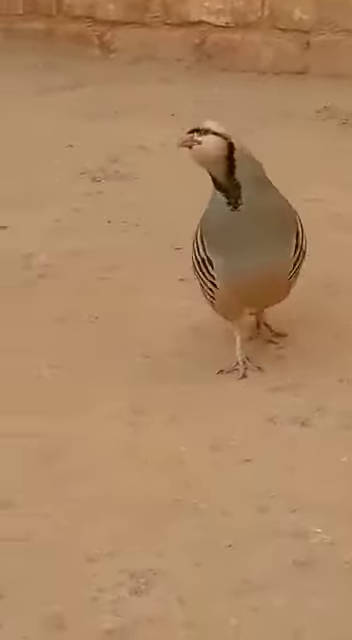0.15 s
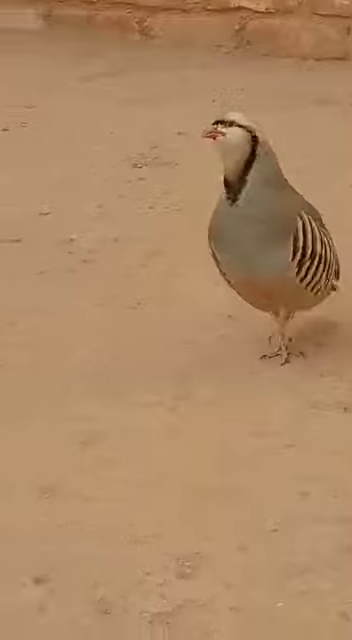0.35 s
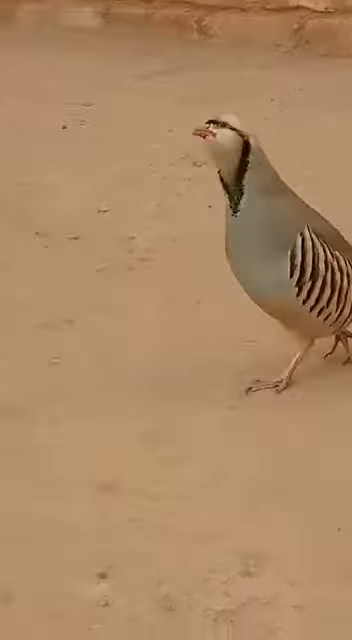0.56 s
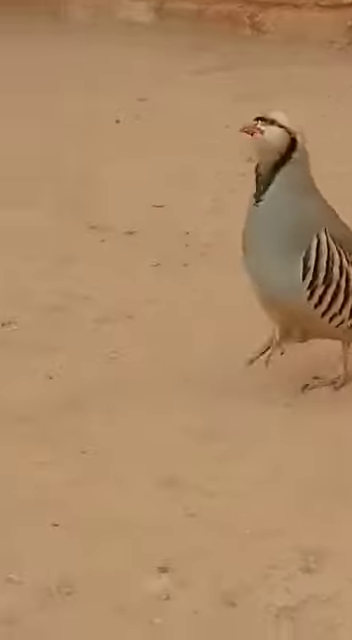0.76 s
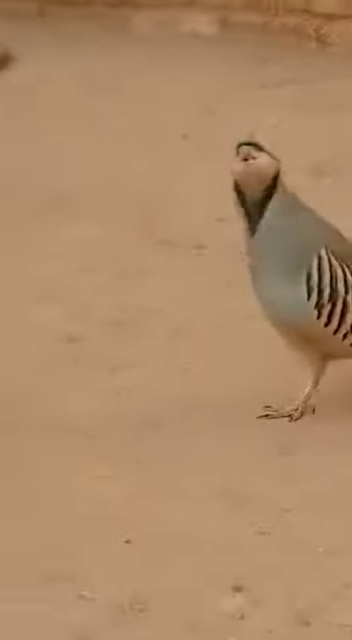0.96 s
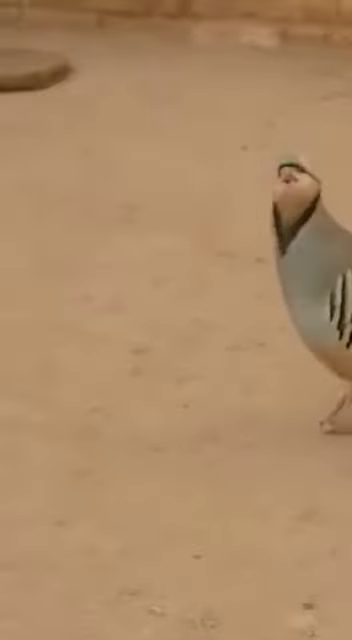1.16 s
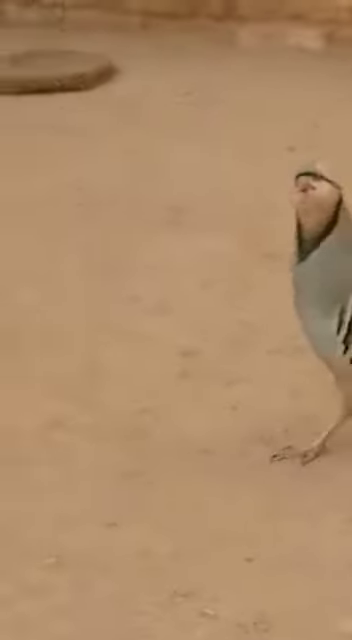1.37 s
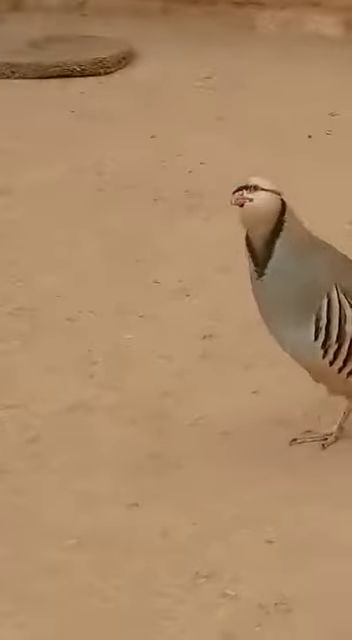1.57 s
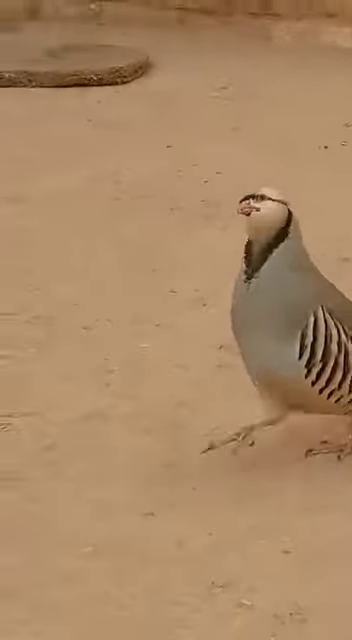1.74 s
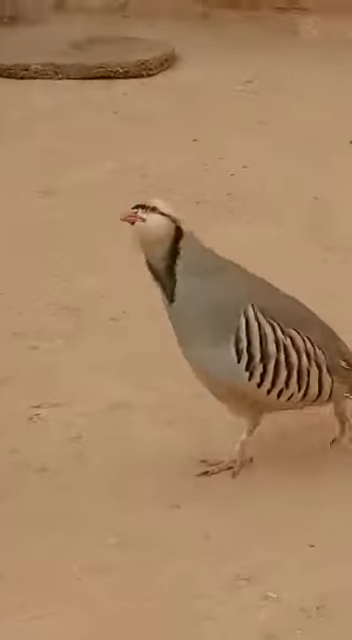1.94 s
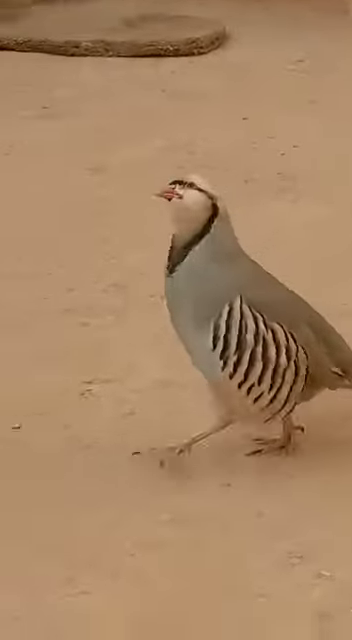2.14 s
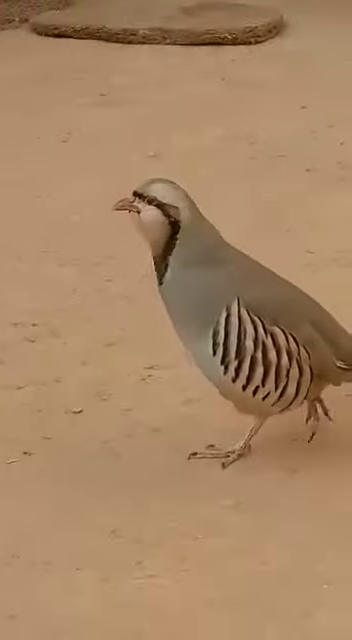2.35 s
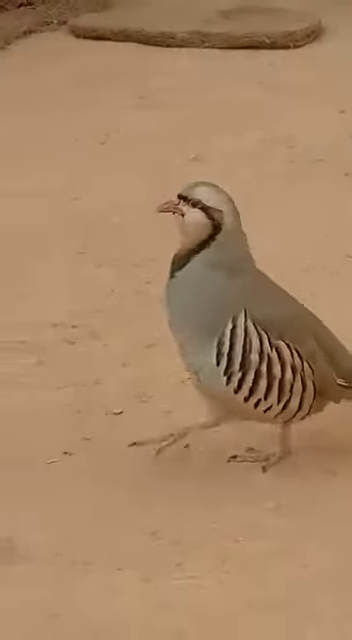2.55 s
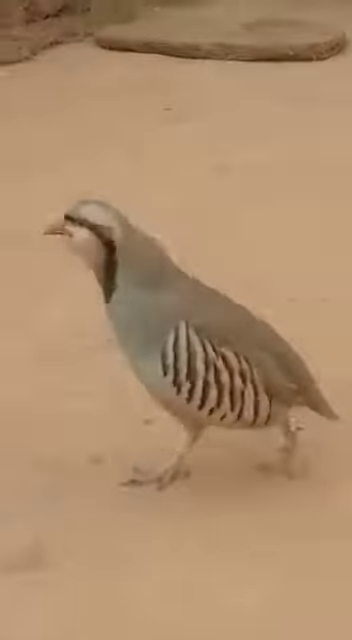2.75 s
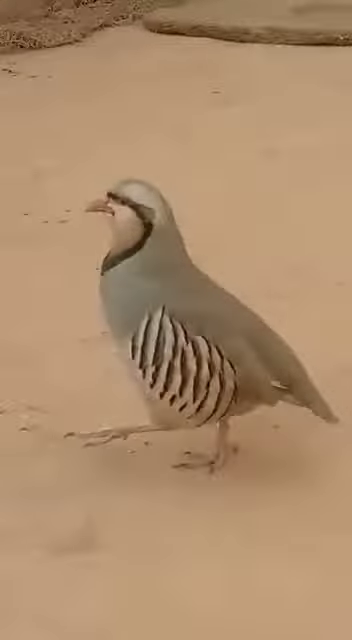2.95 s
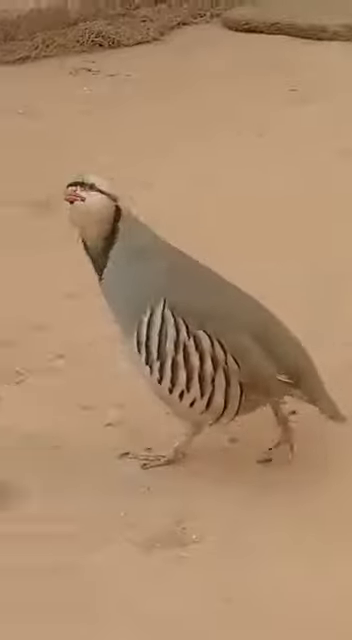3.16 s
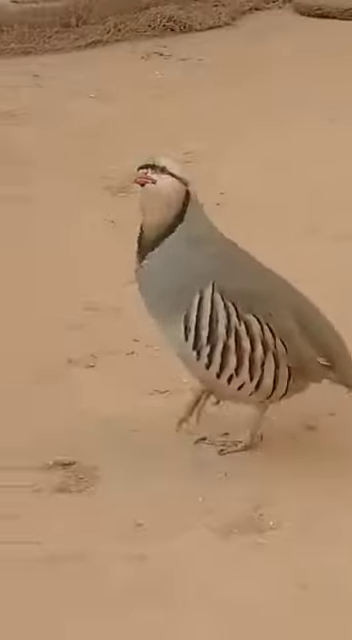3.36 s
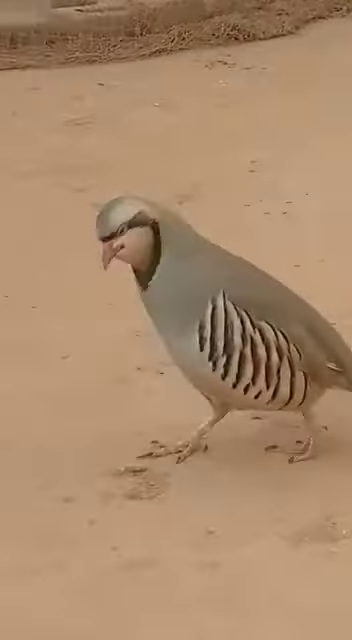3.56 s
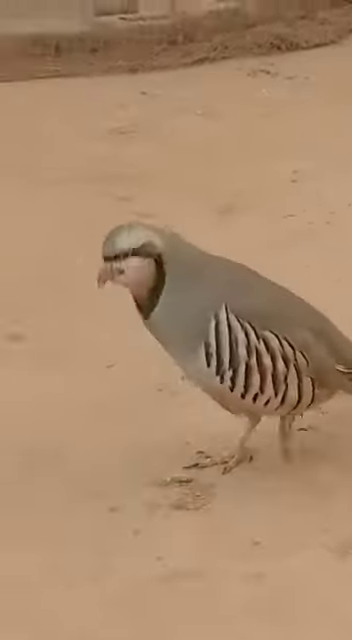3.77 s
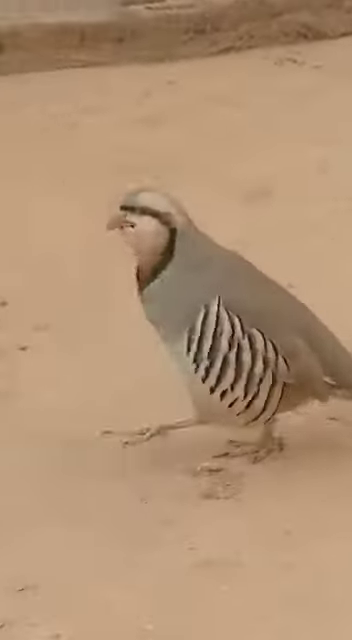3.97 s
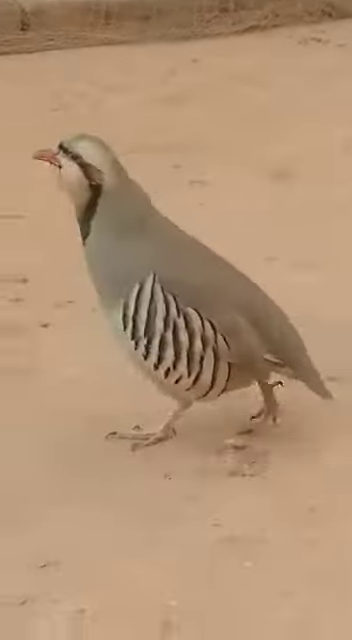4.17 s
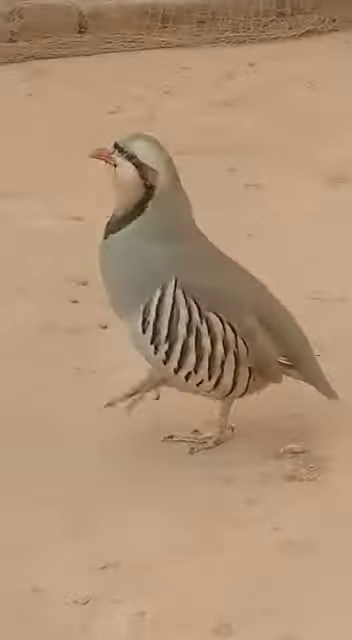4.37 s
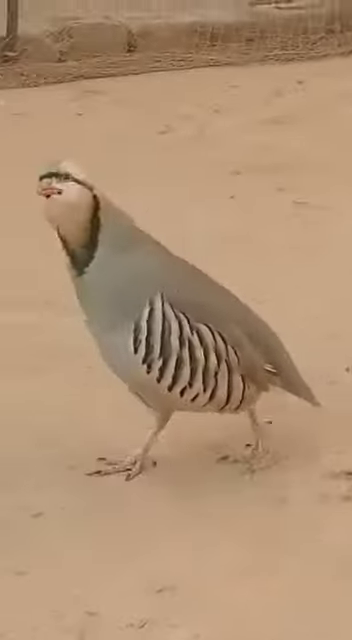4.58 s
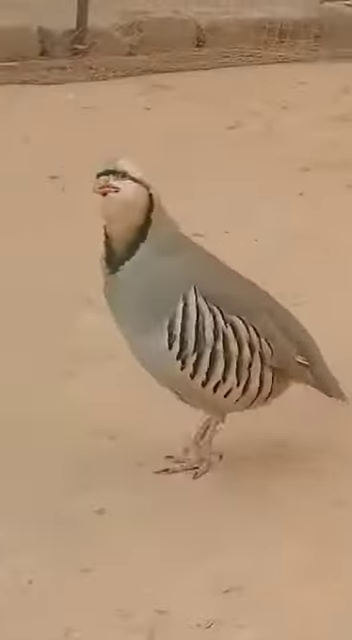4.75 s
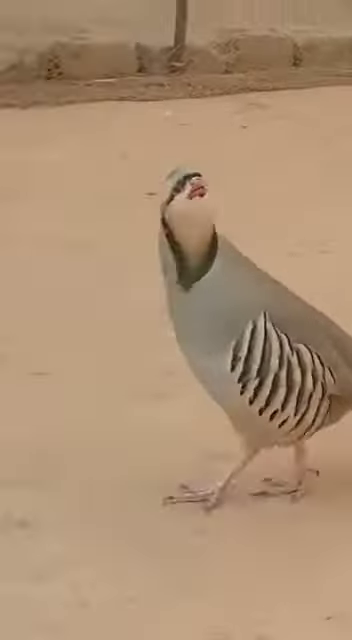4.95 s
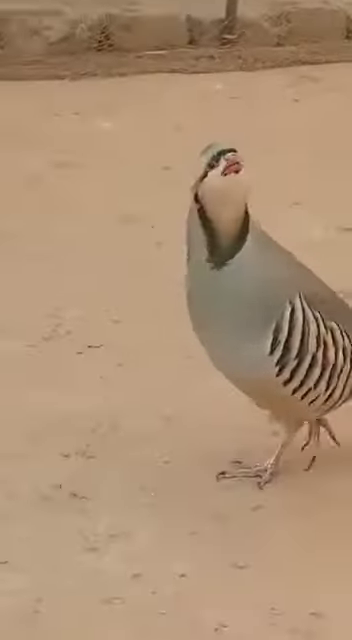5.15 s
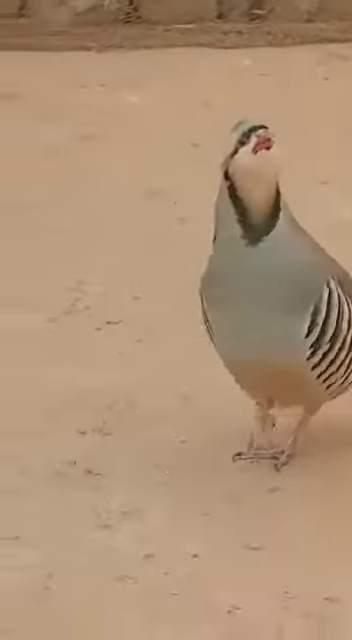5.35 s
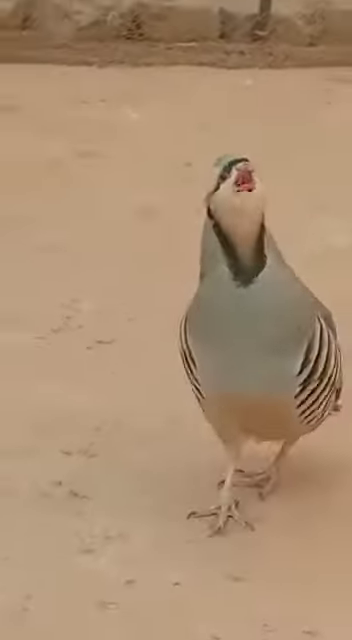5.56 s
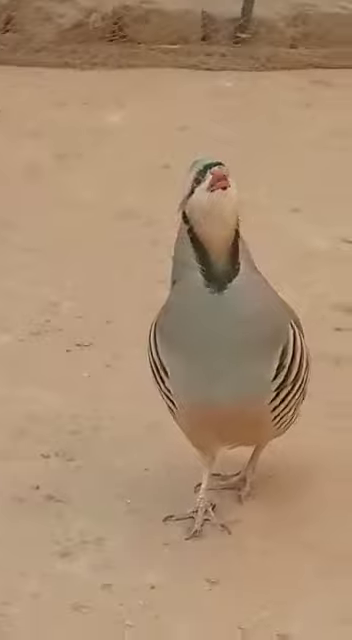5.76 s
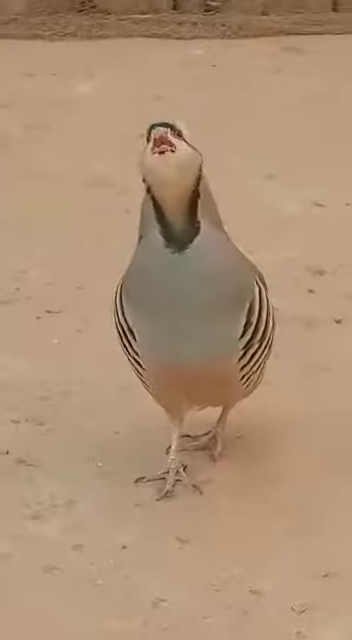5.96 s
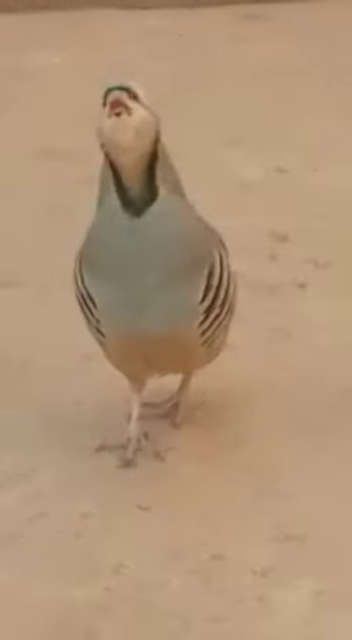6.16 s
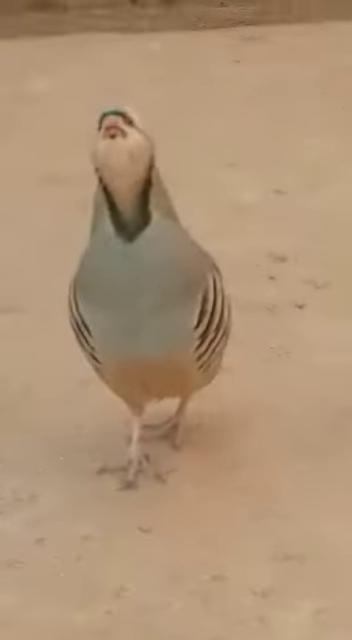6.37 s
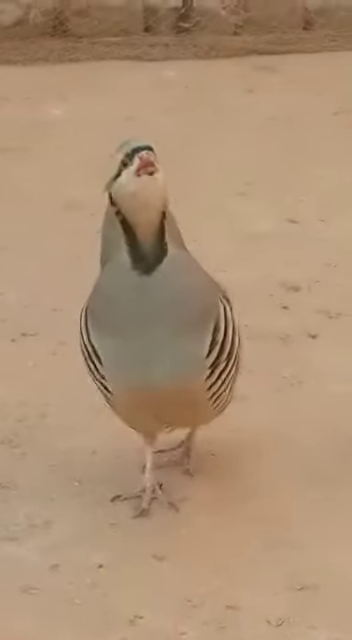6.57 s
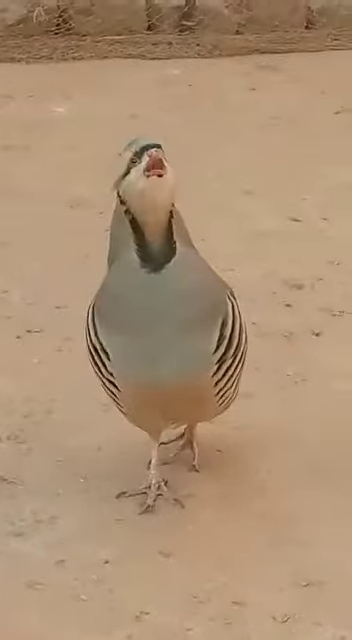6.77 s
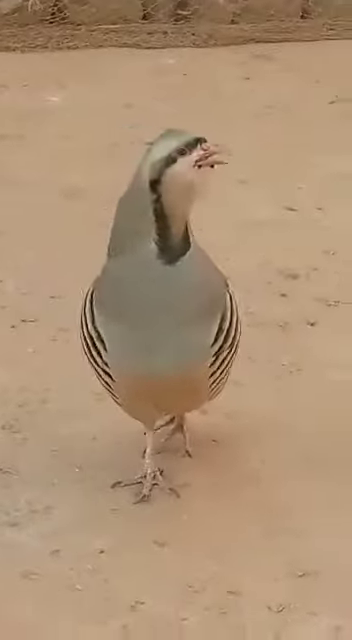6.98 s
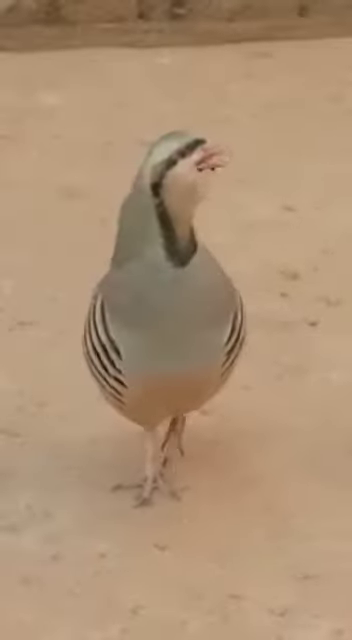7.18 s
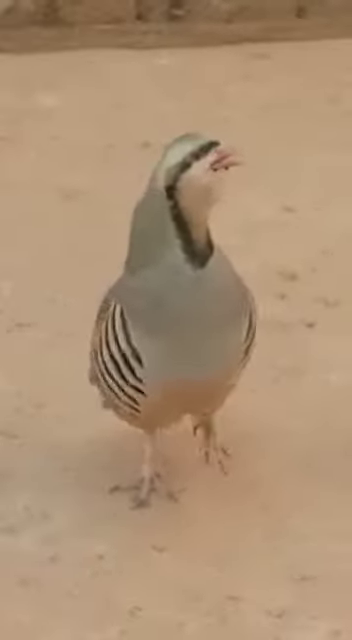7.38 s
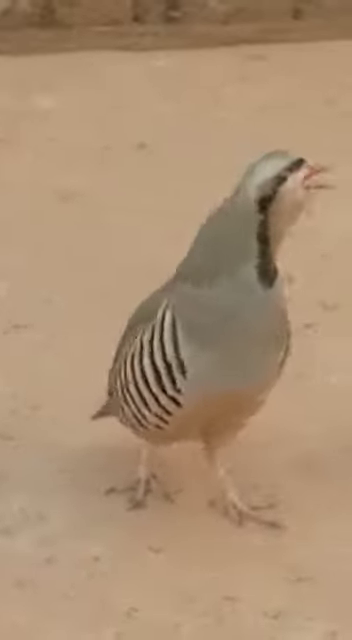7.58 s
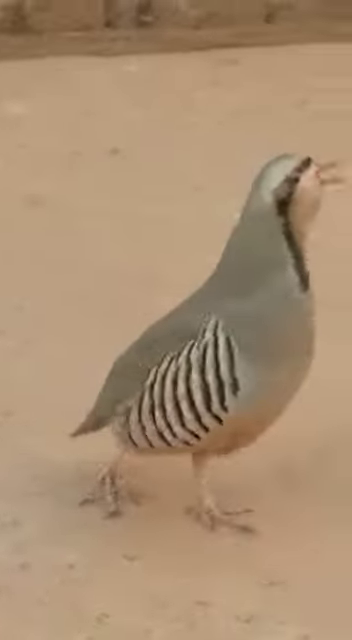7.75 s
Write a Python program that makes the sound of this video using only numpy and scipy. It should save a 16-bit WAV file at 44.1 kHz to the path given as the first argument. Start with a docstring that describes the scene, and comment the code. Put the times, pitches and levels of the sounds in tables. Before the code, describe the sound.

Raspy little squeals from a nearby game bird come first, with low clucks between them. A quieter stretch of soft grunts and peeps follows. Then the bird clucks in a fast, even series, about seven calls a second, swelling and turning sharper, until a piercing whistle and a harsh screech finish it. The open-air yard adds slight reverberation over a very faint background of air.

```python
"""Hoarse squeals, then soft murmurs and peeps, come from a chukar partridge in a dry, walled yard.
They give way to a run of loud "chuck" calls as the beak opens wider; a thin whistle cuts in and a
harsh screech ends the run. The low calls are pulses of the syrinx filtered by throat and beak; in the
squeals its two sides intermodulate. The walls add a short reverberation over a faint background."""
import sys
import numpy as np
from scipy import signal
from scipy.fft import rfft, irfft, next_fast_len
from scipy.io import wavfile
from scipy.ndimage import uniform_filter1d

SR = 44100
rng = np.random.default_rng(int(sys.argv[2]) if len(sys.argv) > 2 else 0)


def master_out(mix):
    """Clip the mix to full scale and print it as 16-bit PCM to the path in sys.argv[1]."""
    frames = np.transpose(np.atleast_2d(mix))
    ceiling = np.clip(frames, -1, 1)
    pcm = np.round(ceiling * 32767).astype(np.int16)
    wavfile.write(sys.argv[1], SR, pcm)


N = 344862
TOP_HZ = 16000


# the bird's excitement: t/s, beak opening/(0-1), roughness/(0-1)
EXCITEMENT = [(0.301, 0.24, 0.58), (3.4, 0.05, 0.51), (4.45, 0.05, 0.65), (4.93, 0.28, 0.47),
              (5.1, 0.59, 0.57), (5.35, 0.56, 0.65), (5.5, 0.72, 0.28), (5.64, 0.93, 0.39),
              (5.921, 0.91, 0.43), (6.1, 0.98, 0.61), (6.95, 0.99, 0.83), (7.25, 0.92, 0.53),
              (7.7, 0.96, 0.65)]
# chuck calls: onset t/s, duration/s, pitch f/Hz, throat level/dB, beak level/dB
CHUCKS = [(0.369, 0.039, 572, -43, -43), (1.377, 0.041, 574, -41, -39), (2.108, 0.035, 546.6, -42.5, -36.5),
          (2.469, 0.033, 558.4, -43, -37.5), (2.534, 0.036, 610, -50, -48.5),
          (3.396, 0.036, 543, -42.5, -37.5), (4.026, 0.0364, 582, -42, -39.5),
          (4.43, 0.035, 537, -43.5, -39), (4.529, 0.046, 585, -49.5, -47.5),
          (4.777, 0.034, 473, -41.5, -39.5), (4.942, 0.039, 517.7, -39, -38.5),
          (5.093, 0.039, 512.5, -39, -35.5), (5.204, 0.036, 457, -45, -46), (5.353, 0.034, 510, -36, -38.5),
          (5.498, 0.038, 502, -31.5, -35.5), (5.64, 0.042, 504, -32, -30.5),
          (5.783, 0.045, 517.6, -30.5, -32), (5.922, 0.042, 517, -30, -29.5),
          (6.063, 0.042, 498.3, -31.5, -25.5), (6.202, 0.039, 521, -30, -26), (6.338, 0.04, 528, -31, -26),
          (6.476, 0.075, 512.3, -33, -25.5), (6.674, 0.045, 522.7, -33, -25), (6.811, 0.073, 521, -33, -25),
          (6.986, 0.047, 514.7, -32, -26.5), (7.115, 0.04, 528, -35, -28.5),
          (7.223, 0.064, 500, -35.5, -32.5), (7.393, 0.041, 509, -30.5, -29),
          (7.529, 0.041, 500.7, -33.5, -27.5), (7.641, 0.07, 511.6, -39, -30.5)]

def chucks(long_s=0.055, first_push_s=0.031, second_onset_s=0.018):
    """Tract tuning: opening the beak draws two resonances together, steepening attack and pitch fall."""
    out = np.zeros(N)
    times, openings, roughnesses = np.transpose(EXCITEMENT)
    for start, length, hz, throat_db, beak_db in CHUCKS:
        opening, rough = np.interp(start, times, openings), np.interp(start, times, roughnesses)
        throat_hz = np.interp(opening, [0, 1], [1235, 1477])
        beak_hz = np.interp(opening, [0, 1], [5390, 3915])
        fall_oct = np.interp(opening, [0, 1], [0.397, 0.537])
        peak_at = np.interp(opening, [0, 1], [0.43, 0.23])  # fraction of the call
        growth_db = 0.28 * (throat_db + 31)  # fundamental and mid band grow more slowly than the throat
        timbre = dict(throat_hz=throat_hz, throat_db=throat_db, beak_hz=beak_hz, beak_db=beak_db,
                      fundamental_db=growth_db - 50.5, mid_db=growth_db - 49.5,
                      droop_oct=0.69 * fall_oct)
        if length >= long_s:  # a long call opens with an extra push on a nearly level pitch
            add(out, start, cluck(first_push_s, 0.96 * hz, fall_oct=0.06, rough=0.47 * rough,
                                  peak_at=0.48, **timbre))
            start, length = start + second_onset_s, length - second_onset_s
        add(out, start, cluck(length, hz, fall_oct, rough, peak_at, **timbre))
    return out


# weaker resonances of the open throat: f/Hz, bandwidth/Hz, level/dB re the beak resonance
UPPER_FORMANTS = [(4243, 1150, -15), (6490, 930, -14), (7490, 1070, -22.5), (9980, 1300, -33),
                  (11870, 1700, -35.5), (15000, 1090, -29)]

def cluck(length, hz, fall_oct, rough, peak_at, throat_hz, throat_db, beak_hz, beak_db,
          fundamental_db, mid_db, droop_oct, beak_width_hz=560):
    """Source and filter: uneven closures of the syrinx sag in pitch and excite the throat and beak."""
    n = int(length * SR)
    progress = np.linspace(0, 1, n)
    rough = np.clip(rough, .15, 1)
    # the pitch scoops up as the membrane starts, then falls with the pressure
    scoop_oct = 0.197 * np.exp(-progress / 0.121)
    pitch = hz * 2 ** (-fall_oct * (progress ** 2 - .15) - scoop_oct)
    jitter = rough * (0.063 * wander(n, 915) + 0.036 * wander(n, 168.4))
    phase = phase_of(pitch * (1 + jitter))
    orders = np.arange(1, int(TOP_HZ / hz) + 1)[:, None]
    smear_rad = 0.93 * rng.standard_normal(orders.shape)  # spreads each closure, softening its click
    pulses = unit(np.cos(orders * phase + smear_rad).sum(0))
    air = 0.96 * rough * rng.standard_normal(n)
    # the push rises and tapers off; the upper resonances die before the low ones
    arch = np.sin(np.pi * np.interp(progress, [0, peak_at, 1], [0, .5, 1])).clip(0)
    shimmer = undb(2.34 * wander(n, 382.5))
    low_envelope = shimmer * arch ** np.linspace(.6, 0.87, n)
    high_envelope = shimmer * arch ** np.linspace(.8, 1.192, n)
    ring_out = (0, 256)
    fundamental = np.sin(phase) * shimmer * np.sin(np.pi * progress).clip(0) ** 1.17
    voice = undb(fundamental_db) * unit(np.pad(fundamental, ring_out))
    drooping_hz = throat_hz * 2 ** (droop_oct * (.25 - progress ** 2))
    throat = gliding_resonance(pulses + 1.1 * air, drooping_hz, width_hz=400)
    throat = saturate(throat, span_s=.004) * low_envelope
    voice += undb(throat_db) * unit(resonance(np.pad(throat, ring_out), throat_hz, width_hz=1500))
    # f/Hz, drive bandwidth/Hz, level/dB, air gain, envelope
    bands = [(2400, 800, mid_db, 1, high_envelope), (beak_hz, beak_width_hz, beak_db, 2, high_envelope)]
    bands += [(f, width, beak_db + db, 2, high_envelope) for f, width, db in UPPER_FORMANTS]
    bands += [(740, 550, fundamental_db - 5.5, 16, low_envelope)]  # a low rasp
    for f, width, db, air_gain, envelope in bands:
        # each resonance loads the membrane, which saturates and drives it in turn
        drive = saturate(resonance(pulses + air_gain * air, f, width), span_s=.004) * envelope
        voice += undb(db) * unit(resonance(np.pad(drive, ring_out), f, 2.26 * width))
    return voice


# transfer curve of the throat in a squeal: f/Hz, gain/dB
SQUEAL_THROAT = [(300, -58.5), (600, -12), (1200, -25.5), (1900, -6.5), (2500, -7), (3200, -2),
                 (3900, -2.5), (4700, 1.5), (5700, -3), (6500, -9), (8000, -22), (10000, -28), (13000, -18),
                 (15500, -19.5)]
# squeals: onset t/s, rise/s, hold/s, fall/s, first f/Hz, held f/Hz, last f/Hz, level/dB,
# flank roughness/(0-1), hold roughness/(0-1)
SQUEALS = [(0.034, 0.052, 0.014, 0.033, 906, 3243, 3940, -30, 0.55, 0.94),
           (0.115, 0.004, 0.0089, 0.0065, 2580, 2740, 2850, -26, 0.65, 0.26),
           (0.138, 0.019, 0.009, 0.037, 2500, 1900, 1350, -36.5, 0.75, 0.71),
           (0.503, 0.017, 0.042, 0.026, 2290, 2470, 1714, -27, 0.74, 0.6),
           (0.766, 0.034, 0.032, 0.026, 2296, 2700, 1627, -26, 0.78, 0.22),
           (1.059, 0.034, 0.0099, 0.0051, 2166, 2684, 2840, -23.5, 0.68, 0.36),
           (1.109, 0.0036, 0.014, 0.0031, 3110, 3340, 3300, -40, 0.7, 0.5),
           (1.131, 0.003, 0.003, 0.036, 2590, 2295, 1857, -29, 0.53, 0.25),
           (1.479, 0.033, 0.019, 0.008, 1390, 1924, 2170, -41, 0.5, 0.6),
           (1.537, 0.014, 0.012, 0.0066, 2130, 2548, 3000, -23.5, 0.4, 0.73),
           (1.563, 0.0064, 0.016, 0.036, 3033, 2681, 1427, -25.5, 0.68, 0.34),
           (1.8, 0.031, 0.019, 0.0056, 2280, 2795, 3070, -24, 0.76, 0.34),
           (1.86, 0.0028, 0.015, 0.024, 2720, 2400, 1960, -29, 0.6, 0.46),
           (2.204, 0.029, 0.041, 0.0023, 1446, 3630, 3780, -35.5, 0.42, 0.16),
           (2.269, 0.0018, 0.024, 0.028, 3800, 3615, 1740, -34, 0.4, 0)]

def squeals(lower_ratio=0.68):
    """Intermodulation: both sides of the syrinx sing at once; their combination tones blur to a rasp."""
    out = np.zeros(N)
    for start, *gesture in SQUEALS:
        hz, rough, db = swoop(*gesture, climb=0.0254, onset_db=-14.5, end_db=-11)
        n = len(hz)
        rough = rough.clip(.1, 1)
        jitter = 0.13 * rough ** 1.3
        upper, lower = (phase_of(side_hz * (1 + jitter * wander(n, 1500) + 0.012 * wander(n, 130)))
                        for side_hz in (hz, lower_ratio * hz))
        upper_side = np.sin(upper) + .5 * np.sin(2 * upper) + 0.13 * np.sin(3 * upper)
        lower_side = np.sin(lower) + 1.1 * np.sin(2 * lower)
        sum_tones = 0.79 * np.sin(upper + lower) + 0.15 * np.sin(2 * upper + lower)
        air = 0.796 * rough * rng.standard_normal(n)
        source = upper_side + rough ** 1.52 * (lower_side + sum_tones) + air
        voice = saturate(colour(source, SQUEAL_THROAT), span_s=.006)
        flutter_db = 2 * rough * wander(n, 370)
        add(out, start, voice * undb(db + flutter_db) * fade(n))
    return out


def swoop(rise_s, hold_s, fall_s, first_hz, held_hz, last_hz, db, flank_rough, hold_rough,
          climb, onset_db, end_db, settle_s=0.0058, break_up_s=0.02):
    """Pressure control: the pitch, roughness and level of a cry follow a rise, a hold and a fall."""
    rise_s, hold_s, fall_s = np.maximum([rise_s, hold_s, fall_s], .002)
    corners = np.cumsum([0, rise_s, hold_s, fall_s])
    t = np.arange(0, corners[-1], 1 / SR)
    hz = np.interp(t, corners, [first_hz, held_hz * (1 - climb), held_hz * (1 + climb), last_hz])
    on_flank = np.maximum((corners[1] - t) / settle_s, (t - corners[2]) / break_up_s).clip(0, 1)
    rough = hold_rough + on_flank * (flank_rough - hold_rough)
    rising, falling = (1 - t / rise_s).clip(0), ((t - corners[2]) / fall_s).clip(0)
    return hz, rough, db + onset_db * rising ** 1.9 + end_db * falling


# spectrum of the bird's hiss: f/Hz, level/dB
HISS_SPECTRUM = [(530, -60), (900, -40), (1290, -33), (1950, -26.5), (2860, -1.5), (3510, -7.5), (3820, 2),
                 (4740, -0.5), (5350, 3), (6110, -4), (6640, 1.5), (10800, -39.5), (12700, -41),
                 (15200, -28), (16000, -49)]
# envelope of the screech: t/s, level/dB
SCREECH = [(7.657, -39), (7.668, -27), (7.7, -21), (7.73, -21), (7.76, -23), (7.811, -22), (7.82, -25)]

def screech():
    """Aperiodic oscillation: at full pressure the voice loses its pitch in a saturated, fluttering hiss."""
    out = np.zeros(N)
    times, levels = np.transpose(SCREECH)
    db = np.interp(np.arange(times[0], times[-1], 1 / SR), times, levels)
    hiss = saturate(colour(rng.standard_normal(len(db)), HISS_SPECTRUM), span_s=.002)
    flutter_db = 2 * wander(len(db), 501)
    add(out, times[0], unit(hiss) * undb(db + flutter_db))
    return out


# whistles: onset t/s, rise/s, hold/s, fall/s, first f/Hz, held f/Hz, last f/Hz, level/dB,
# flank roughness/(0-1), hold roughness/(0-1)
WHISTLES = [(0.589, 0.019, 0.03, 0.018, 3760, 3905, 3700, -35, 0.094, 0.052),
            (3.179, 0.012, 0.04, 0.089, 2540, 2710, 2620, -62.5, 0.18, 0.25),
            (7.032, 0.01, 0.0036, 0.023, 6950, 7400, 6170, -32, 0.4, 0.26),
            (7.045, 0.016, 0.005, 0.008, 2260, 2340, 2440, -37, 0.73, 0.54),
            (7.071, 0.0065, 0.0092, 0.009, 4970, 5760, 5930, -13.5, 0.35, 0.066),
            (7.09, 0.013, 0.0614, 0.04, 5810, 5927, 5870, -21, 0.16, 0.18)]

def whistles():
    """Random modulation: a thin sine tone wavers in frequency and amplitude over a rush of air."""
    out = np.zeros(N)
    for start, *gesture in WHISTLES:
        hz, rough, db = swoop(*gesture, climb=0.005, onset_db=-20, end_db=-12)
        n = len(hz)
        jitter = rough * (0.075 * wander(n, 2000) + 0.05 * wander(n, 150.2))
        tone = np.sin(phase_of(hz * (1 + jitter)))
        air = undb(-2) * rough * unit(colour(rng.standard_normal(n), HISS_SPECTRUM))
        flutter_db = 12 * rough * wander(n, 250)
        add(out, start, (tone + air) * undb(db + flutter_db) * fade(n))
    return out


# peeps: onset t/s, duration/s, pitch f/Hz, throat level/dB, beak resonance f/Hz, beak level/dB
PEEPS = [(1.289, 0.065, 1258, -57.5, 3930, -59.5), (2.32, 0.0374, 1328, -46.5, 4130, -50),
         (2.758, 0.05, 901, -50.5, 4870, -54.5), (2.89, 0.033, 1153, -47.5, 4680, -46.5),
         (3.03, 0.035, 1076, -44, 5500, -49.5), (3.3, 0.038, 1139, -49, 4540, -46.5),
         (3.715, 0.038, 1127, -50, 4490, -53.5), (4.129, 0.0353, 1120, -48, 4700, -50.5),
         (5.31, 0.04, 1213, -50.5, 5250, -48), (5.722, 0.042, 1210, -51, 5100, -49.5)]

def peeps():
    """Upper register: the syrinx vibrates more evenly, about an octave above the chucks, falling little."""
    out = np.zeros(N)
    for start, length, hz, throat_db, beak_hz, beak_db in PEEPS:
        add(out, start, cluck(length, hz, fall_oct=0.27, rough=0.33, peak_at=0.5,
                              throat_hz=1160, throat_db=throat_db, droop_oct=0.1,
                              beak_hz=beak_hz, beak_db=beak_db, beak_width_hz=1200,
                              fundamental_db=throat_db - 11, mid_db=throat_db - 10.5))
    return out


# soft grunts: onset t/s, duration/s, pitch f/Hz, throat resonance f/Hz, throat level/dB, beak level/dB
MURMURS = [(0.155, 0.059, 563, 1480, -49.5, -54), (0.267, 0.026, 603, 1390, -58.5, -63.5),
           (0.462, 0.038, 625, 1280, -56.5, -63.5), (0.659, 0.051, 698, 1410, -54, -53.5),
           (0.846, 0.028, 612, 1210, -56, -46.5), (0.994, 0.028, 626, 1110, -52.5, -60.5),
           (1.139, 0.03, 645, 1260, -55.5, -58), (1.211, 0.037, 624, 1460, -52, -54.5),
           (1.594, 0.033, 594, 1090, -50, -59), (1.73, 0.029, 658, 1264, -57, -61),
           (1.882, 0.026, 552, 1250, -49, -50), (2.032, 0.028, 643, 1260, -56, -65),
           (2.986, 0.048, 519, 1074, -55, -84), (3.672, 0.057, 693, 817, -49.5, -56.5),
           (3.795, 0.031, 419.6, 1060, -48, -60.5), (3.834, 0.022, 440, 1015, -55, -75),
           (4.214, 0.033, 415.3, 1130, -48, -57.5), (4.24, 0.044, 446.3, 1130, -52, -70),
           (4.614, 0.039, 530, 1070, -51, -63), (4.647, 0.044, 435.5, 1000, -56, -65),
           (4.741, 0.041, 649, 1320, -44, -53.5), (4.925, 0.034, 641.5, 1420, -45.5, -54),
           (5.015, 0.036, 590, 1200, -51, -65), (5.046, 0.022, 482, 1110, -47.5, -67),
           (5.402, 0.032, 541, 1080, -55, -68), (5.436, 0.031, 469, 1180, -51, -80),
           (5.84, 0.036, 488, 1280, -49, -69), (6.123, 0.033, 475, 1100, -49, -53.5),
           (6.248, 0.023, 448, 1380, -42.5, -64), (6.592, 0.045, 505, 1280, -44, -76),
           (6.79, 0.03, 541, 1370, -43.5, -78), (6.962, 0.028, 545, 1420, -40, -59.5)]

def murmurs():
    """Weak drive, beak almost shut: the pitch sinks steeply; a low formant favours the fundamental."""
    out = np.zeros(N)
    for start, length, hz, throat_hz, throat_db, beak_db in MURMURS:
        fundamental_db = -58.5 + 0.53 * (throat_db + 49.5) - 7 * np.log2(throat_hz / 1235)
        add(out, start, cluck(length, hz, fall_oct=0.8, rough=0.44, peak_at=0.54,
                              throat_hz=throat_hz, throat_db=throat_db, droop_oct=0.32,
                              beak_hz=4310, beak_db=beak_db, beak_width_hz=1900,
                              fundamental_db=fundamental_db, mid_db=beak_db - 9.5))
    return out


# reverberation time of the yard: f/Hz, T60/s
YARD_T60 = [(300, 0.6), (1200, 0.49), (3000, 0.46), (6000, 0.4), (12000, 0.07)]
# colouring of the reflections: f/Hz, gain/dB
YARD_RESPONSE = [(200, -15), (500, 4.5), (800, 12.5), (1200, 6.5), (1700, -0.5), (2500, -5), (4000, -6.5),
                 (6000, -1.5), (8000, 5), (15000, -6)]

def yard(x, send_db, build_s=0.0023):
    """Reverberation: clumps of reflections off the walls build up and die away, the treble first."""
    t = np.arange(int(SR * .9)) / SR
    reflections = rng.standard_normal(len(t)) * undb(2.5 * wander(len(t), 400))
    hz, frame_s, spectrum = signal.stft(reflections, SR, nperseg=256)
    decay = undb(-60 * frame_s / on_log(hz, YARD_T60)[:, None])
    tail = signal.istft(spectrum * decay, SR)[1][:len(t)] * (1 - np.exp(-t / build_s))
    tail = colour(tail / np.sqrt(np.sum(tail ** 2)), YARD_RESPONSE)
    return x + undb(send_db) * signal.fftconvolve(x, tail)[:N]


# spectra of the air, the rumble and the rustle: f/Hz, level/dB
AIR_SPECTRUM = [(25, -34), (50, -22), (68, -7), (140, 0), (230, -15), (380, -12), (500, -7), (1200, -6),
                (2200, -24), (3000, -10), (4800, -24), (6200, -17), (8500, -42), (13500, -46), (15500, -30)]
RUMBLE_SPECTRUM = [(25, -24), (48, -10.5), (66, -1), (95, -6), (200, -19), (600, -67)]
RUSTLE_SPECTRUM = [(2000, -21), (6500, 13), (9000, -2), (13000, -22), (15300, 1), (16000, -11)]
# their envelopes: t/s, level/dB (the air's re air_db)
AIR_SWELL = [(0, 4.5), (1.4, -2.5), (2.7, -2), (3.9, 5), (6.501, 0.5), (7.82, -2)]
RUMBLE_LEVEL = [(0, -111), (0.3, -93), (1.4, -70), (1.7, -85.5), (4.2, -87), (5.162, -75), (5.8, -94),
                (6.5, -67), (7.2, -89), (7.82, -87)]
RUSTLE_LEVEL = [(4.7, -81), (5.12, -64.5), (5.27, -64.5), (5.5, -71), (5.8, -66)]

def background(air_db=-72):
    """Ambient noise: faint, slowly swelling air, a low rumble and a brief airy rustle add in power."""
    t = np.arange(N) / SR

    def bed(spectrum, levels):
        noise = unit(colour(rng.standard_normal(N), spectrum))
        return noise * undb(np.interp(t, *np.transpose(levels)))

    air = undb(air_db) * bed(AIR_SPECTRUM, AIR_SWELL)
    rustling = (t > RUSTLE_LEVEL[0][0]) & (t < RUSTLE_LEVEL[-1][0])
    return air + bed(RUMBLE_SPECTRUM, RUMBLE_LEVEL) + rustling * bed(RUSTLE_SPECTRUM, RUSTLE_LEVEL)


def resonance(x, hz, width_hz):
    """Cascaded resonators: one band-pass applied twice gives steep skirts."""
    b, a = signal.iirpeak(hz, hz / width_hz, fs=SR)
    return signal.lfilter(b, a, signal.lfilter(b, a, x))


def gliding_resonance(x, hz, width_hz):
    """Heterodyning: shift down, low-pass and shift back, so the pass band follows the curve hz."""
    carrier = np.exp(1j * phase_of(hz))
    low_pass = signal.butter(2, width_hz / 2, fs=SR, output="sos")
    return (signal.sosfilt(low_pass, x / carrier) * carrier).real


def saturate(x, span_s):
    """Amplitude limiting: the level evens out over span_s, as in a saturated membrane."""
    power = uniform_filter1d(x ** 2, size=int(span_s * SR))
    return x / np.sqrt(power.clip(0) + np.mean(x ** 2) / 20)


def colour(x, points):
    """Linear filtering by a curve of (f/Hz, gain/dB) points."""
    size = next_fast_len(len(x) + 2048)
    gain = undb(on_log(np.fft.rfftfreq(size, 1 / SR), points))
    return irfft(rfft(x, size) * gain, size)[:len(x)]


def on_log(hz, points):
    """Interpolation of (f/Hz, value) points on a log-frequency axis."""
    f, value = np.transpose(points)
    return np.interp(np.log(np.maximum(hz, 1)), np.log(f), value)


def wander(n, rate_hz):
    """Smooth random modulation of unit RMS, with rate_hz new values a second."""
    at = np.arange(n) * rate_hz / SR
    return unit(np.interp(at, np.arange(2048), rng.standard_normal(2048)))


def phase_of(hz):
    """Phase as the time integral of frequency."""
    return 2 * np.pi * np.cumsum(hz) / SR


def fade(n):
    """Cosine tapering over a millisecond or two at each end."""
    return signal.windows.tukey(n, min(1, 140 / n))


def undb(db):
    """Amplitude ratio of a level."""
    return 10 ** (np.asarray(db) / 20)


def unit(x):
    """Normalisation to unit RMS."""
    return x / np.sqrt(np.mean(x ** 2) + 1e-18)


def add(out, start, x):
    """Superposition of x on out from its start time."""
    i = int(start * SR)
    out[i:i + len(x)] += x[:max(len(out) - i, 0)]


def scene():
    """Superposition: low calls and shrill cries each reverberate in the yard, over its background."""
    low_calls = chucks() + murmurs() + peeps()
    cries = squeals() + whistles() + screech()
    return (yard(low_calls, send_db=-16.5) + yard(cries, send_db=-11.5) + background())[None]


def record(dry):
    """Band limiting: a steep low-pass cuts the treble above TOP_HZ."""
    return signal.sosfilt(signal.ellip(10, .2, 70, TOP_HZ, fs=SR, output="sos"), dry)


dry = scene()
out = record(dry)
master_out(out)
```